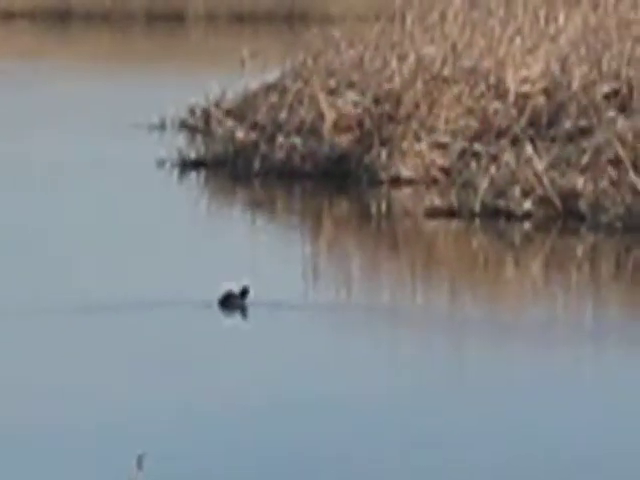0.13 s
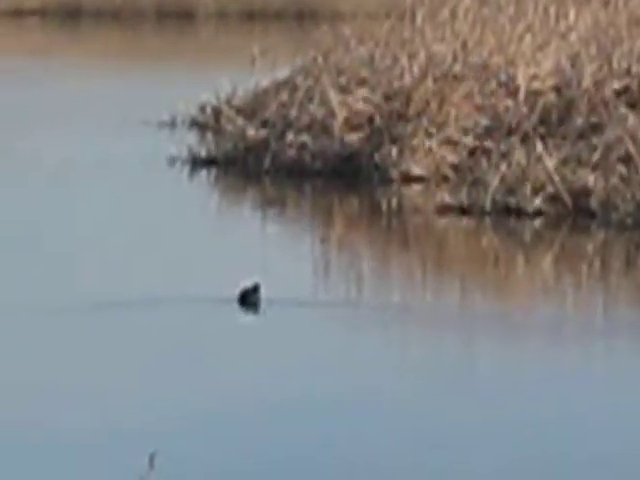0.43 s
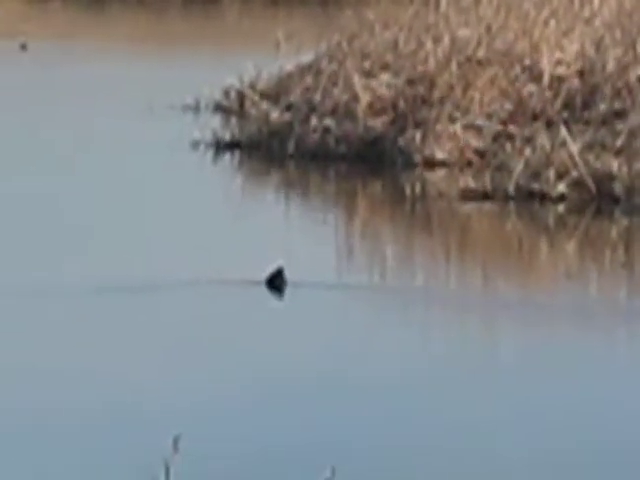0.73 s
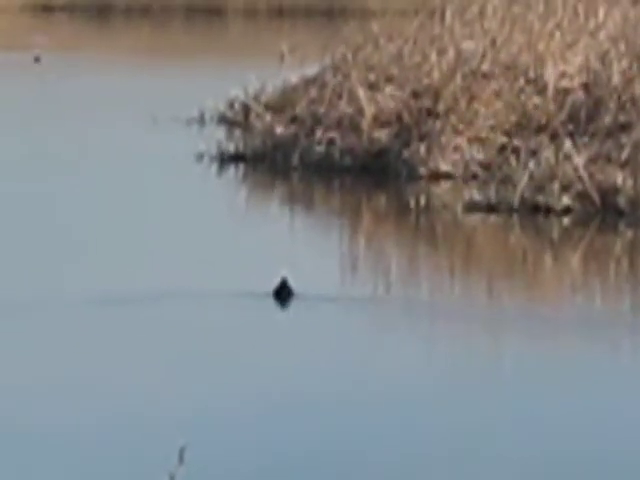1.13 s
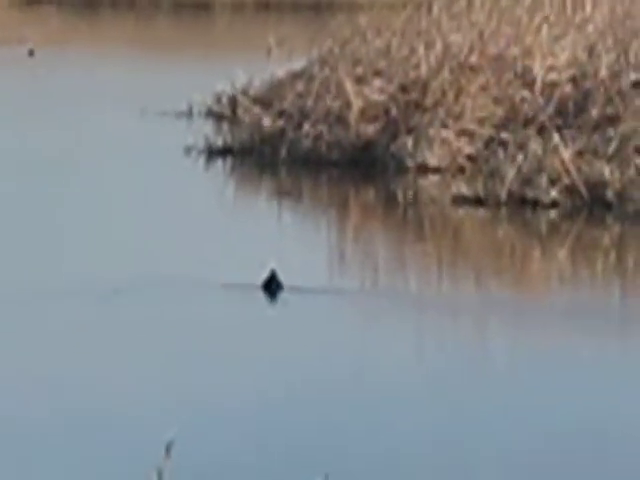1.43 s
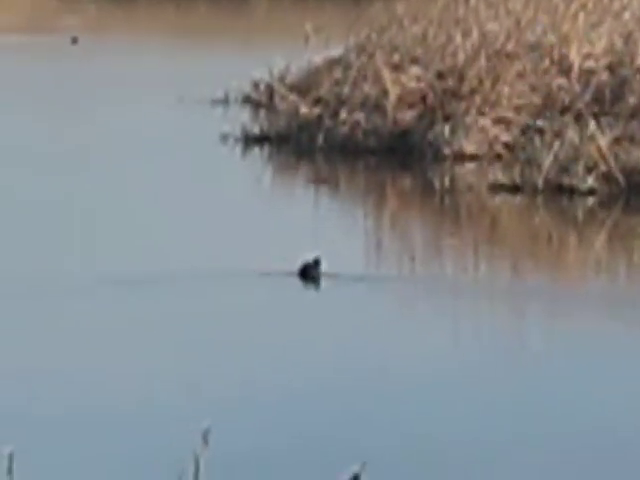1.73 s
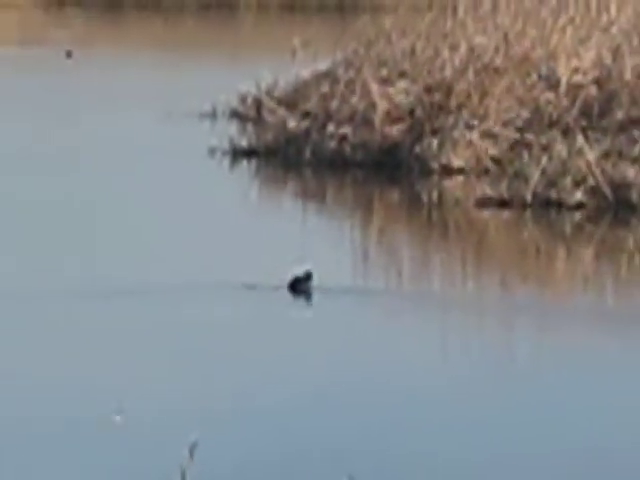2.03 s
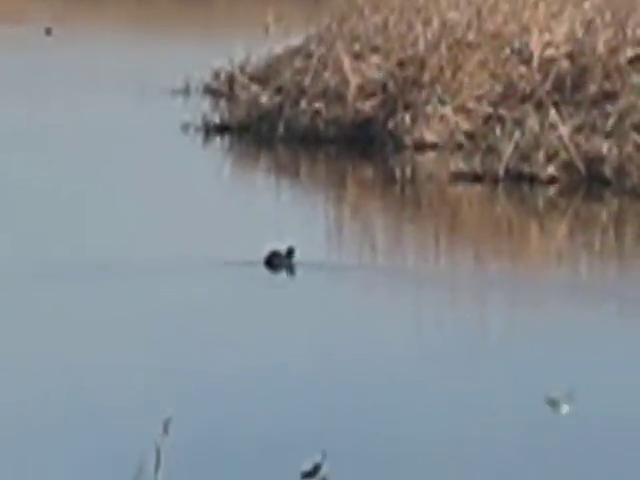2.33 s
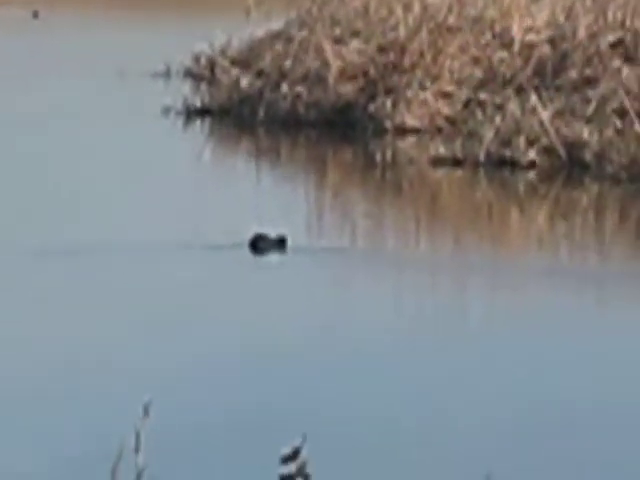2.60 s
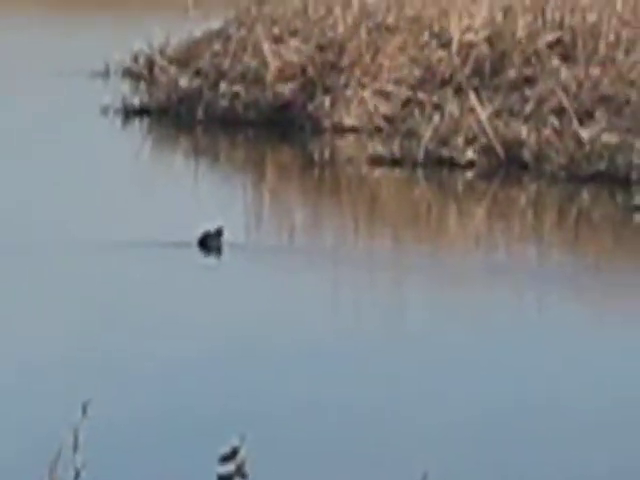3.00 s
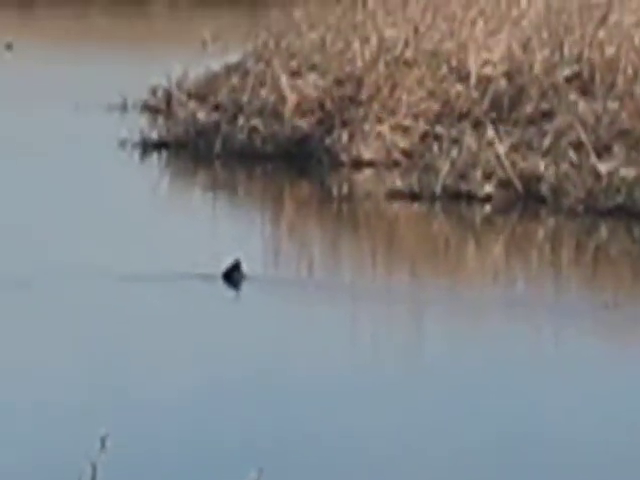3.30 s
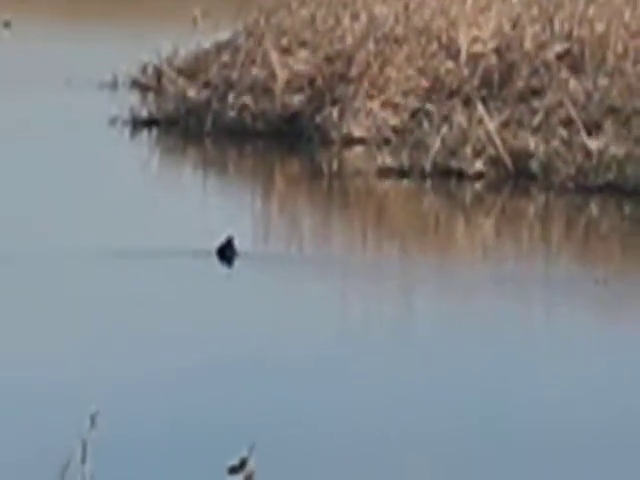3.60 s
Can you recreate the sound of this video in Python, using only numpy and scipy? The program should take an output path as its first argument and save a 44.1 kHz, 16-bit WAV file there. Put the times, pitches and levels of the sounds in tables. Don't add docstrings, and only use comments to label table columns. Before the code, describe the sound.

One abrupt, raspy coot call, dropping in pitch, stands out after a windy lead-in with barely audible far-off clucks. Gusts moan and rumble over open water, with a distant engine drone and thin camera hiss.

```python
import sys
import numpy as np
from scipy import signal
from scipy.fft import rfft, irfft, next_fast_len
from scipy.io import wavfile
from scipy.ndimage import map_coordinates

SR = 44100
rng = np.random.default_rng(int(sys.argv[2]) if len(sys.argv) > 2 else 0)


def inscribe(sig):
    pcm = np.round(np.clip(np.atleast_2d(sig).T, -1, 1) * 32767)
    wavfile.write(sys.argv[1], SR, pcm.astype(np.int16))


def level_to_linear(level):
    exponent = np.asarray(level, float) / 20
    return 10 ** exponent


N = 165375


def unit(x):
    return x / np.sqrt(np.mean(np.abs(x) ** 2) + 1e-20)


def along(points, hz):
    f, v = np.transpose(points)
    return np.interp(np.log(hz + 1), np.log(f + 1), v)


def curves(rows):
    s, *cols = np.transpose(rows)
    return [np.interp(np.arange(N) / SR, s, c) for c in cols]


def wobble(rate):
    knots = rng.standard_normal(int(N * 400 / SR))
    return map_coordinates(knots, [np.arange(N) * min(rate, 390) / SR])


def filtered(x, response):
    m = next_fast_len(N + SR // 2)
    return irfft(rfft(x, m) * response(np.fft.rfftfreq(m, 1 / SR)), m)[..., :N]


def coloured(spectrum):
    def response(hz):
        return level_to_linear(along(spectrum, hz) - 60 * (hz > 3 * spectrum[-1][0]))
    return unit(filtered(rng.standard_normal(N), response))


def fuzzy(pitch_hz, width_hz):
    a, b = filtered(rng.standard_normal((2, N)), lambda hz: 1 / (1 + (2 * hz / width_hz) ** 2))
    turn = 2 * np.pi * np.cumsum(pitch_hz) / SR
    return unit(a * np.cos(turn) + b * np.sin(turn))


def throat(f):
    centre_hz, width_hz, gain = 1175, 130, .8
    resonance = 1j * f * width_hz / (centre_hz ** 2 - f * f + 1j * f * width_hz)
    return level_to_linear(-3) * (1 + gain * resonance)


def coot():
    # time in seconds, pitch in Hz.
    call = [
        (2.503, 1150),
        (2.507, 1240),
        (2.515, 1255),
        (2.555, 1240),
        (2.575, 1200),
        (2.6, 1170),
        (2.615, 1115),
        (2.648, 1065),
    ]
    # time in seconds, level in dB, lift of the second overtone in dB, lift of the higher ones in dB.
    puffs = [(2.505, -29.5, 4, -1.5), (2.515, -34.5, 7.5, 3), (2.526, -24, -12, -3.5),
             (2.54, -25.5, -7.5, 2), (2.548, -44, 4, 1), (2.557, -29, -9, 4), (2.563, -45, 0, -6),
             (2.576, -25, -14, 0), (2.587, -24.5, -13, -8), (2.601, -26.5, -10, -4.5), (2.611, -27, 1, -11),
             (2.621, -31.5, -1.5, 5), (2.626, -45, 0, 9), (2.635, -39, 6, -5), (2.645, -43.5, 14.5, 15)]
    # multiple of the pitch, level in dB.
    partials = [(1, 0), (2, -0.5), (3, -18), (4, -25.5), (5, -27)]
    hoarse = [.3, .95, .95, .7, .7]
    # frequency in Hz, level in dB.
    rasp_spectrum = [(900, -7), (1500, 9), (2800, -18.5), (4300, -22), (5600, -25), (8000, -39)]
    onset_s, puff_s = .0015, .0058
    rasp_db, snap_db, snap_s, snap_t60_s = -17.5, -40, 2.639, 0.035
    hoarse_width_hz, top_fade_db_per_s = 130, 70
    slip_rad, jitter = .8, .02

    t = np.arange(N) / SR
    hz, = curves(call)
    span = slice(round(call[0][0] * SR) - 400, round(call[-1][0] * SR) + 400)
    s, db, second_db, top_db = np.transpose(puffs)[:, :, None]
    onset = np.clip((t[span] - call[0][0]) / onset_s + 1, 0, 1)
    bumps = np.exp(-((t[span] - s) / puff_s) ** 2) * onset
    turn = 2 * np.pi * np.cumsum(hz * (1 + jitter * wobble(300))) / SR

    out = level_to_linear(snap_db - 60 * np.abs(t - snap_s) / snap_t60_s) * coloured(rasp_spectrum[2:])
    for (k, level), share in zip(partials, hoarse):
        slip = slip_rad * rng.standard_normal(s.shape)
        clear = np.sqrt(2) * np.sin(k * turn[span] + slip)
        blurred = fuzzy(k * hz, k * hoarse_width_hz)[span]
        voice = (clear + share * blurred) / np.hypot(1, share)
        fade_db = max(k - 3, 0) * top_fade_db_per_s * (s - s[0])
        puff_db = db + level + (k == 2) * second_db + (k > 2) * top_db - fade_db
        out[span] += (level_to_linear(puff_db) * bumps * voice).sum(axis=0)
    out[span] += (level_to_linear(db + rasp_db) * bumps).sum(axis=0) * coloured(rasp_spectrum)[span]
    return filtered(out, throat)


def far_coot():
    # time of the highest pitch in seconds, that pitch in Hz, level in dB.
    clucks = [
        (.163, 1255, -60),
        (.281, 1235, -63),
        (.521, 1250, -62),
        (.643, 1270, -65),
        (.897, 1270, -61),
        (1.046, 1290, -64),
        (1.335, 1150, -65),
        (1.478, 945, -59),
    ]
    # multiple of the pitch, level in dB.
    cluck_partials = [(1, -4), (2, 0), (3, -6)]
    cluck_s, arch, late_s = .015, .08, .005

    out = np.zeros(N)
    u = np.arange(-SR // 20, SR // 20) / SR
    swell = np.exp(-((u - late_s) / cluck_s) ** 2)
    for s, hz, db in clucks:
        turn = 2 * np.pi * np.cumsum(hz * (1 - arch * (u / cluck_s) ** 2)) / SR
        note = sum(level_to_linear(level) * np.sin(k * turn) for k, level in cluck_partials)
        out[round(s * SR) - SR // 20:][:len(u)] += level_to_linear(db) * np.sqrt(2) * swell * note
    return out


def reeds(x):
    # frequency in Hz, time to fade by 60 dB in seconds.
    fade_times = [(1100, .6), (2300, .28), (4000, .12)]
    # frequency in Hz, level in dB.
    bank_colour = [(1000, 15), (1400, -2), (2000, -8), (4000, -38)]

    out = 0
    for db, delay, dull in ((-13.5, .012, 0), (-28.5, 0.32, 1)):
        hz, t, z = signal.stft(rng.standard_normal(SR // 2), SR, nperseg=256)
        fade_db = -60 * t / along(fade_times, hz)[:, None]
        colour_db = dull * along(bank_colour, hz)[:, None]
        tail = signal.istft(z * level_to_linear(fade_db + colour_db), SR, nperseg=256)[1]
        tail = tail / np.linalg.norm(tail)
        late = np.pad(x, (round(delay * SR), 0))
        out = out + level_to_linear(db) * signal.fftconvolve(late, tail)[:N]
    return out


def wind():
    # time in seconds, moan level in dB, moan pitch in Hz, low tone in dB, top tone in dB.
    gusts = [(.03, -52, 600, -39, -56), (.17, -37, 605.1, -35.5, -76), (.33, -46.5, 600, -43, -76),
             (.72, -53, 581.3, -40.5, -59), (.85, -30, 590, -28.5, -52), (.95, -39, 590, -43.5, -49.5),
             (1.1, -34, 588.8, -36.5, -45), (1.28, -49.5, 570.4, -38, -58), (1.49, -33.5, 572.9, -32, -47),
             (1.85, -42, 573.1, -38, -52.5), (2.07, -44.5, 571.8, -38.5, -52),
             (2.22, -39, 572.2, -37.5, -49.5), (2.6, -47.5, 545.1, -33.5, -52),
             (2.85, -37.5, 538.6, -35, -77), (3.07, -45.5, 531, -36.5, -44),
             (3.3, -32.5, 531.2, -32.5, -46), (3.52, -44, 520.8, -38, -44.5), (3.75, -37, 518, -29, -47.5)]
    # multiple of the moan pitch, width in Hz.
    moan_tones = [(1, 113), (1.53, 105)]
    # frequency in Hz, level in dB per Hz.
    rumble_spectrum = [(12, -35), (25, -22.5), (120, -8), (200, -1), (380, -6.5), (700, -7), (1100, -18.5),
                       (1600, -38)]
    low_hz, low_width_hz, low_follows = 299.8, 116, 0.4468
    rumble_db, rumble_follows = -40, .2

    db, hz, low_db, top_db = curves(gusts)
    moan = 0
    for level_db, (k, width) in zip((db, top_db), moan_tones):
        moan = moan + level_to_linear(level_db + 1.7 * wobble(9)) * fuzzy(k * hz, width)
    low_pitch = low_hz * (hz / hz.mean()) ** low_follows
    low = level_to_linear(low_db + 1.1 * wobble(9)) * fuzzy(low_pitch, low_width_hz)
    rumble_level = rumble_db + rumble_follows * (db - db.mean()) + 0.4 * wobble(5.08)
    return moan + low + level_to_linear(rumble_level) * coloured(rumble_spectrum)


def engine():
    # pitch in Hz, level in dB, width in Hz.
    drone = [
        (66, -54, 28),
        (129.7, -47, 8),
    ]
    return sum(level_to_linear(db + 0.23 * wobble(3.35)) * fuzzy(np.full(N, hz), width) for hz, db, width in drone)


def camera():
    # frequency in Hz, level in dB per Hz.
    hiss_spectrum = [(300, 0), (1700, 9), (3000, 3), (6000, 1), (9000, -1), (11000, -2), (13800, -5),
                     (15500, -5.5)]
    buzz_spectrum = [(1500, -26), (3000, -18), (6500, -2.5), (9000, -12), (12000, -11), (14000, -9),
                     (15000, -10), (15700, -0.5)]
    hiss_db, buzz_db = -57, -46
    frame_hz, buzz_at_s, buzz_s = 30, .0156, 0.0011

    t = np.arange(N) / SR
    since = (t - buzz_at_s + .5 / frame_hz) % (1 / frame_hz) - .5 / frame_hz
    bursts = np.exp(-(2 * since / buzz_s) ** 2)
    buzz = level_to_linear(buzz_db + 1.3 * wobble(20)) * bursts * coloured(buzz_spectrum)
    return level_to_linear(hiss_db) * coloured(hiss_spectrum) + buzz


def scene():
    birds = coot() + far_coot()
    return (birds + reeds(birds) + wind() + engine() + camera())[None]


def low_pass(x):
    return signal.sosfilt(signal.butter(12, 16820, fs=SR, output="sos"), x)


def record(dry):
    line_hz, line_db = 15734, -83
    notch_hz, notch_width_hz, top_hz = line_hz / 2, 2000, 15760

    def notch(f):
        away = notch_hz * notch_hz - f * f
        return away / (away + 1j * f * notch_width_hz) * (f < top_hz)

    whistle = level_to_linear(line_db) * np.sqrt(2) * np.sin(2 * np.pi * line_hz * np.arange(N) / SR)
    return low_pass(filtered(dry, notch) + whistle)


dry = scene()
out = record(dry)
inscribe(out)
```